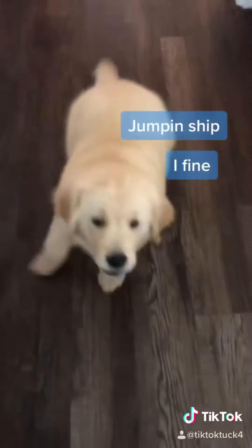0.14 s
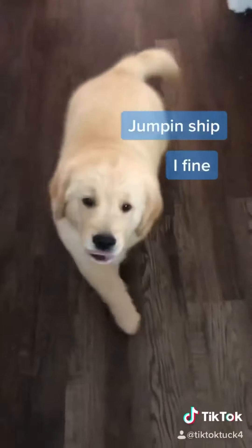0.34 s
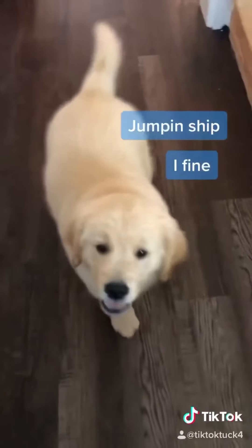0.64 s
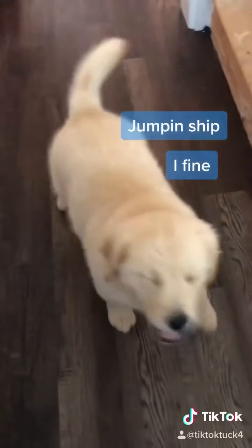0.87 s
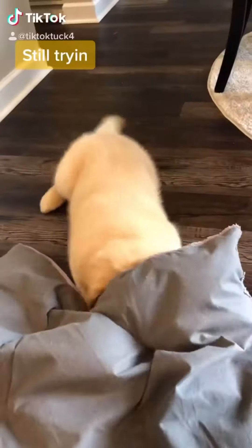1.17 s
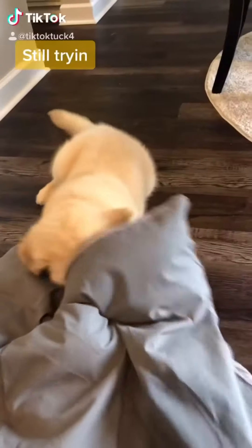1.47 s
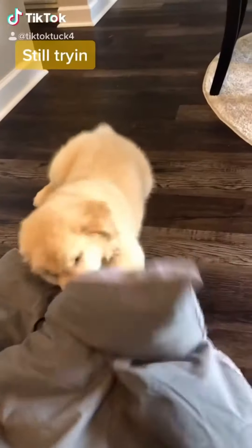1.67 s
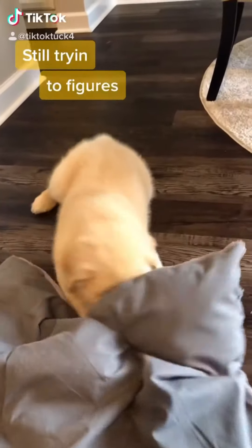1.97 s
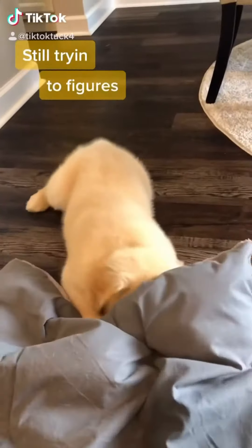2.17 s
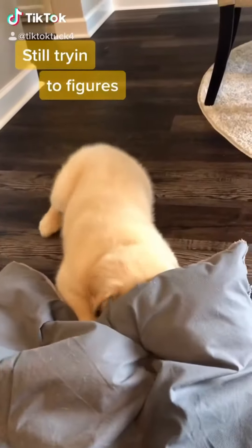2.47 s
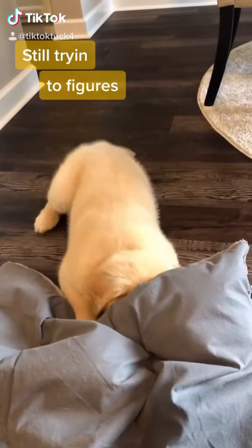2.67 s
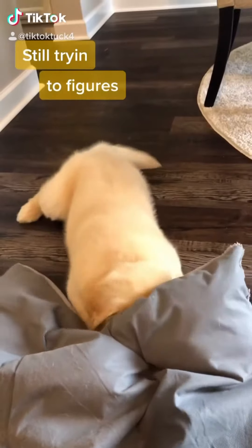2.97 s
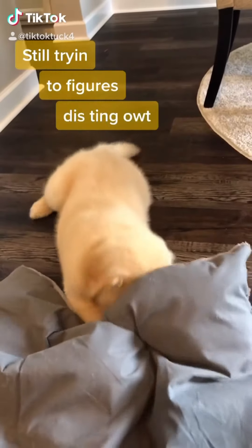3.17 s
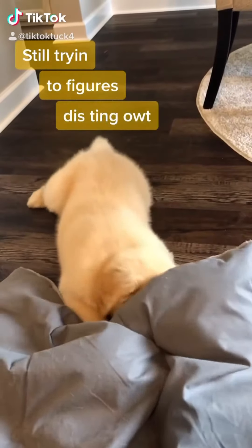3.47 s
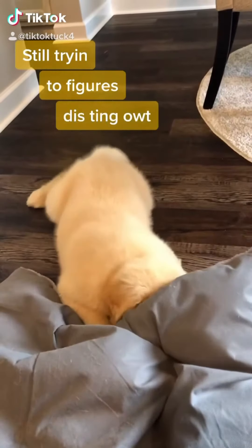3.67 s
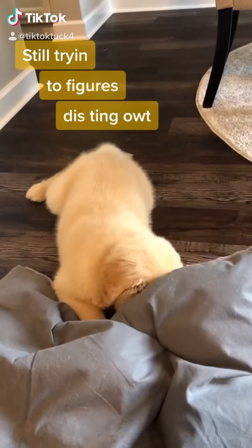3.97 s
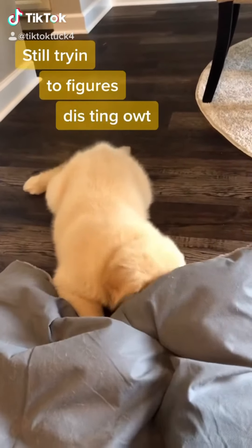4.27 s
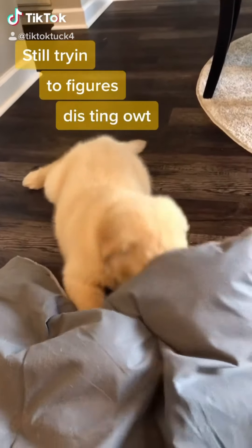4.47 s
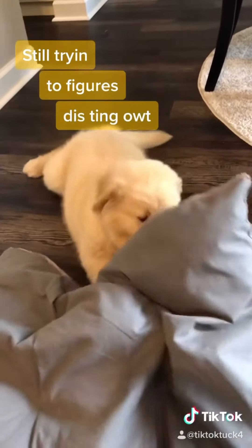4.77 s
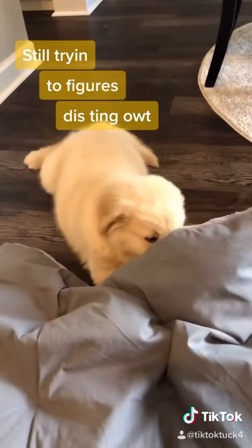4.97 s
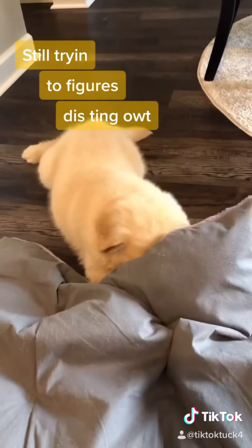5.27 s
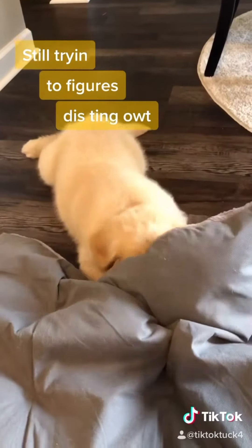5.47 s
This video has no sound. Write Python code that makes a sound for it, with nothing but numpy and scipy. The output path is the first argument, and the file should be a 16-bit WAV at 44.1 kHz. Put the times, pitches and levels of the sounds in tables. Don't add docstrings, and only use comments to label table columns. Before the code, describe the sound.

Close mono indoor sound. First a scuff and a tight burst of loud paw steps on a wood floor, with boomy air and a thin whine. After a brief dropout comes quiet room tone with fridge hum, then irregular bedding rustles and snaps, scratching claws, soft paw taps and rebounding elbow blows in clusters, a small sniff, and a last shove.

```python
import sys
import numpy as np
from scipy import signal
from scipy.fft import rfft, irfft
from scipy.io import wavfile
from scipy.ndimage import uniform_filter1d

SR = 44100
rng = np.random.default_rng(int(sys.argv[2]) if len(sys.argv) > 2 else 0)


def volts(x):
    e = np.asarray(x, float) / 20
    return 10 ** e


def master_out(mix):
    frames = np.transpose(np.atleast_2d(mix))
    ceiling = np.clip(frames, -1, 1)
    pcm = np.round(ceiling * 32767).astype(np.int16)
    wavfile.write(sys.argv[1], SR, pcm)


N = 247842
T = np.arange(N) / SR

CUT_S, BACK_S, CLEAR_S = .7215, .953, 1.097

# (frequency [Hz], density [dB per Hz])
ROOM_AIR = [(15, -34.5), (25, -12.5), (80, -0.5), (148, -3.5), (216, -3.5), (307, -2.5), (670, -12.5),
            (1000, -13), (1550, -15.5), (2320, -28.5), (3120, -22), (6630, -31), (15700, -32.5)]
# (frequency [Hz], density [dB per Hz])
FIRST_ROOM_AIR = [(15, -55), (25, -19), (59, -3), (113, 0), (316, -10), (575, -11), (977, -11),
                  (1120, -9.5), (1500, -17.5), (1950, -24.5), (3300, -120)]
# (frequency [Hz], width [Hz], level [dB])
FRIDGE_HUM = [(210.7, 10, -69.5), (74.5, 22, -71)]
ROOM_DB, FIRST_ROOM_DB = -63.5, -49.5

# (start [s], time to die away [s], level [dB])
SHOVES = [
    (.003, 0.18, -33.5),
    (.362, 0.048, -32),
    (.397, 0.22, -34),
    (.955, 0.23, -57),
    (2.15, 0.071, -52.5),
    (2.7, 0.24, -50.5),
    (3.6, 0.28, -52.5),
    (4.042, 0.24, -47),
    (5.455, 0.015, -43),
    (5.47, 0.12, -53),
]
# (middle [s], half length [s], level [dB])
DRAGS = [(0.31, 0.16, -51.5), (0.685, .2, -47.5), (1.081, 0.11, -48.5), (1.22, 0.079, -54),
         (1.444, 0.022, -58), (1.705, 0.16, -61.5), (1.847, 0.11, -54), (1.933, 0.12, -47.5),
         (2.319, 0.13, -45.5), (2.555, 0.13, -43), (2.668, .07, -49), (2.913, 0.18, -65),
         (3.036, 0.099, -47), (3.138, 0.17, -51.5), (3.417, 0.19, -56.5), (4.004, 0.034, -55),
         (4.46, 0.31, -57.5), (4.767, 0.089, -61), (5.072, 0.12, -61), (5.2, 0.083, -49),
         (5.307, .11, -38.5)]
# (frequency [Hz], width [Hz], level [dB])
BOARD_MODES = [(600, 276, 3), (994, 140, -0.5), (1520, 97, -5.5), (377.3, 190, -9.5)]
# (time [s], peak level [dB], end pitch [Hz], decay [ms])
THUDS = [(.004, -38, 422, 35), (1.683, -43, 312, 7.4), (3.357, -44, 297, 9.8), (0.353, -26.5, 182, 9.3),
         (1.24, -48, 156, 17), (1.428, -52, 278, 15), (1.83, -47, 300, 10), (1.901, -45, 277, 10),
         (2.692, -41, 130, 12.5), (3.169, -55, 265, 20), (3.968, -55, 288, 20), (4.079, -39.5, 292, 10),
         (4.302, -40.5, 211, 7.9), (4.752, -38, 168, 7.7), (5.46, -56, 260, 15)]

# (middle [s], half length [s], level [dB], dry sheen over cloth [dB])
SLIDES = [(.01, 0.06, -68, 0), (0.183, 0.13, -50.5, -3.5), (0.667, 0.088, -54, -35),
          (.97, 0.067, -63, -2.5), (1.07, 0.047, -46.5, -8), (1.21, 0.085, -60, -2.5),
          (2.03, 0.27, -70.5, -9), (1.48, 0.43, -78.5, 6.5), (1.783, 0.18, -60, -6.5),
          (2.314, 0.071, -49, 2.5), (2.386, 0.042, -77, -15), (2.499, 0.018, -47.5, 1),
          (2.537, 0.046, -48.5, 6.5), (2.71, 0.28, -58, -5), (3.045, .085, -46, 1),
          (3.705, 0.18, -65.5, -0.5), (4.148, 0.14, -72.5, -20), (4.49, .28, -67, 2.5),
          (4.77, .13, -69, -15), (5.22, 0.19, -63.5, -2), (5.306, .05, -46, -2.5)]
# (start [s], time to die away [s], level [dB], dry sheen over cloth [dB])
TUGS = [(.331, 0.13, -40, -14.5), (.36, 0.41, -58.5, -12), (1.032, 0.067, -53.5, -8),
        (1.102, 0.065, -48, 1), (1.909, 0.082, -54, 5), (2.132, 0.071, -54, -3), (2.153, 0.056, -45, 3.5),
        (2.269, 0.14, -47.5, 4), (2.472, 0.02, -56, -5), (2.896, 0.052, -61, 4), (2.981, 0.16, -48, -2),
        (3.137, 0.097, -62, 0), (3.207, 0.038, -63, 5), (1.77, 0.35, -66, 1), (3.566, 0.34, -66.5, 0),
        (4.761, 0.019, -67, 18), (4.81, 0.088, -59.5, -9), (4.985, 0.51, -70, 1), (5.35, 0.17, -62.5, -5),
        (5.522, 0.11, -63.5, -9)]
# (frequency [Hz], density [dB per Hz])
FOLD_COLOUR = [(800, -22.5), (1400, -3), (2600, -6.5), (4500, -17), (9000, -39)]
WEAVE_COLOUR = [(1800, -25), (3400, -4), (4400, -2), (7000, -5.5), (11000, -23.5)]
SHEEN_COLOUR = [(5000, -12), (7600, -1), (10000, -3.5), (15700, -8)]
TUG_START_S, SHOVE_START_S = .008, .012
FADE_DB, SWELL_POWER, REST_DB = 19, 1.25, -88
FOLD_DB, FOLD_PER_SHEEN, FOLD_BY_LIMB_DB = -5.5, -0.21, -11

# (time [s], peak level [dB])
SNAPS = [(.3296, -26), (1.029, -38), (1.2318, -38), (1.9064, -37), (2.1505, -29), (2.2687, -32),
         (1.8325, -35), (2.282, -30), (2.345, -24), (2.3127, -43), (2.3248, -24), (2.509, -21),
         (4.7592, -37.5), (5.2767, -38), (5.2965, -34), (5.312, -40), (5.329, -42), (5.521, -54)]
# (time [s], peak level [dB], board pitch [Hz], gap to first rebound [ms])
STEPS = [
    (.3303, -30.5, 744, 6.2),
    (.3521, -11, 870, 3.7),
    (.3748, -19.5, 660, 2.77),
    (.3827, -21, 669, 13.2),
    (.4109, -36, 694, 11),
]
# (time [s], peak level [dB])
CLAWS = [(.3509, -13), (1.051, -39.5), (1.1866, -38.5), (1.2169, -37.5), (1.832, -35), (2.1344, -32),
         (2.2514, -53), (2.3451, -36), (2.3999, -35.5), (2.4795, -31.5), (2.4928, -31), (2.5219, -28),
         (2.5377, -33), (2.616, -36.5), (2.8953, -37), (2.9818, -50), (3.1357, -28), (3.1454, -38),
         (3.207, -44), (4.0342, -48), (4.0617, -43), (4.8115, -48), (5.0637, -46), (5.109, -36.5),
         (5.138, -38.5), (5.1587, -40), (5.1861, -41), (5.2425, -52), (5.442, -43), (3.7306, -46)]
# (time [s], peak level [dB], board pitch [Hz])
TAPS = [(.9865, -51, 495), (1.0356, -45.9, 594), (1.0531, -42, 1110), (1.1075, -49, 1050),
        (1.2163, -55, 1030), (1.4318, -54, 424), (1.354, -54, 980), (1.68, -45.5, 1040),
        (1.8017, -45.5, 814), (1.8315, -46, 800), (1.9037, -36, 804), (1.931, -37.5, 950),
        (2.2537, -55, 624), (2.4005, -39, 834), (2.574, -30.5, 650), (3.1822, -41.5, 606),
        (3.3559, -47.5, 730), (3.591, -51, 750), (3.6375, -35.5, 622), (3.6896, -45.5, 600),
        (3.7307, -41.5, 650), (4.0028, -36, 529), (4.1787, -48.5, 547), (4.7596, -48.5, 590),
        (5.1098, -46, 880), (5.139, -38.5, 586), (1.639, -50, 1128), (5.276, -36.5, 573),
        (5.2965, -34.5, 600), (5.351, -39, 548)]
# (time [s], peak level [dB], board pitch [Hz], gap to first rebound [ms])
BLOWS = [(2.6191, -24.8, 652, 12.5), (2.6466, -29.5, 685, 9.2), (2.6609, -33.5, 620, 5.2),
         (2.6737, -33, 640, 8.7), (2.6876, -45, 610, 10.2), (3.139, -38.5, 694, 8.9),
         (3.9522, -34.5, 583, 9.2), (3.9807, -39, 625, 10.7), (4.0357, -29, 600, 6.3),
         (4.0627, -28, 684, 9.4), (4.0895, -29, 616, 5.7), (5.4438, -35, 600, 4.02),
         (5.4477, -32.5, 600, 14.5)]
REBOUND_DB, REBOUND_PITCH, NEXT_GAP = -5, 0.918, .8
TAP_CYCLES, STEP_CYCLES = 2.59, 2.16

# (time [s], level [dB], nostril resonance [Hz])
SNIFF = [
    (4.68, -80, 2790),
    (4.686, -66, 2820),
    (4.705, -70, 3017),
    (4.735, -63.5, 3400),
    (4.772, -77, 3224),
    (4.8, -62, 3470),
    (4.825, -72.5, 3290),
    (4.875, -78, 4060),
    (4.89, -84, 4110),
]


def unit(x):
    return x / np.sqrt(np.mean(x ** 2))


def band(x, lo_hz, hi_hz, order=2):
    return signal.sosfilt(signal.butter(order, [lo_hz, hi_hz], "band", fs=SR, output="sos"), x)


def colour(x, table):
    hz, db = np.transpose(table)
    f = np.maximum(np.arange(N // 2 + 1) * SR / N, 1)
    gain = volts(np.interp(np.log(f), np.log(hz), db))
    return irfft(rfft(x) * gain, N)


def walk(rate):
    hold = int(SR / rate)
    levels = np.repeat(rng.standard_normal(N // hold + 1), hold)
    return uniform_filter1d(levels, hold)[:N] * 0.952


def add(out, s, x):
    i = int(s * SR)
    out[i:i + len(x)] += x[:N - i]


def room():
    air = volts(ROOM_DB - 2.0) * unit(colour(rng.standard_normal(N), ROOM_AIR))
    low = band(air, 13, 300)
    air = low * volts(2.0 * walk(25)) + (air - low) * volts(2.1 * walk(2.6))
    hum = np.zeros(N)
    for hz, width, db in FRIDGE_HUM:
        hum += volts(db) * unit(band(rng.standard_normal(N), hz - width / 2, hz + width / 2, order=1))
    first_air = unit(colour(rng.standard_normal(N), FIRST_ROOM_AIR))
    first_air = first_air * volts(FIRST_ROOM_DB + 1.2 * walk(5.7))
    return air + np.where(T < BACK_S, first_air, hum)


def whine(hz, db):
    phase = 2 * np.pi * np.cumsum(hz * (1 + 0.0349 * walk(9))) / SR
    waver = unit(band(rng.standard_normal(N), 3, 22, order=1))
    return volts(db) * waver * np.sin(phase) * (T < BACK_S)


def moves(sudden, swelling, start_s):
    t = T[::40]
    levels = []
    for s, long, db, *_ in sudden:
        levels.append(db - FADE_DB * np.maximum((s - t) / start_s, (t - s) / long))
    for s, long, db, *_ in swelling:
        levels.append(db - FADE_DB * np.abs((t - s) / long) ** SWELL_POWER)
    return volts(np.array(levels)) ** 2


def total_db(power):
    level = 10 * np.log10(power.sum(axis=0) + volts(REST_DB) ** 2)
    return np.interp(T, T[::40], level)


def fibres(spread_db, smear_ms):
    size = volts(spread_db * rng.exponential(size=N).clip(0, 3.5)) * (rng.random(N) < .02)
    tail = np.exp(-np.arange(400) / (smear_ms * SR / 1000))
    power = signal.fftconvolve(size ** 2, tail)[:N].clip(0) + 1.3
    return unit(rng.standard_normal(N) * np.sqrt(power))


def shuffle(db):
    push = fibres(spread_db=5.5, smear_ms=2.9) * volts(1.1 * walk(60))
    boards = np.zeros(N)
    for hz, width, mode_db in BOARD_MODES:
        boards += volts(mode_db) * unit(band(push, hz - width / 2, hz + width / 2))
    return volts(db - 4.0) * unit(boards)


def thuds():
    out, t = np.zeros(N), T[:6000]
    rise = np.exp(-t / 0.0078)
    for s, db, hz, decay_ms in THUDS:
        phase = 2 * np.pi * np.cumsum(hz * (1 + 0.36 * rise)) / SR
        shape = (1 - rise) * np.exp(-t * 1000 / decay_ms)
        add(out, s, volts(db) * shape * np.sin(phase))
    return out


def cloth(db, sheen_db, fold_db):
    rub = fibres(spread_db=1.0, smear_ms=1.0) * volts(1.2 * walk(45))
    weave = unit(colour(rub, WEAVE_COLOUR)) * volts(-4.0)
    sheen = unit(colour(rub, SHEEN_COLOUR)) * volts(sheen_db - 2.5)
    fold = unit(colour(rub, FOLD_COLOUR)) * volts(fold_db + 0.5)
    return volts(db) * (weave + sheen + fold)


def bounce(x, share, lag_ms):
    lag_s = lag_ms / 1000 * (1 + 0.37 * walk(7)).clip(.2)
    late = np.interp(T - lag_s, T, x)
    return (x + share * late) / np.sqrt(1 + share ** 2)


def slips(table, hz, ms):
    out, t = np.zeros(N), T[:3000]
    shape = np.exp(-t * 1000 / ms) + 0.85 * np.exp(-t / 0.00071)
    for s, db in table:
        burst = unit(band(rng.standard_normal(3000), hz * .5, hz * 1.3, order=1))
        add(out, s, volts(db - 13.5) * burst * shape)
    return out


def seam_snaps():
    return slips(SNAPS, hz=7050, ms=1.4)


def rings(table, cycles):
    out = []
    for s, db, hz, *gap_ms in table:
        ring_ms = 1000 * cycles / hz
        out.append((s, db, hz, ring_ms))
        if gap_ms:
            gap_s, low_hz = gap_ms[0] / 1000, hz * REBOUND_PITCH
            out.append((s + gap_s, db + REBOUND_DB, low_hz, 1.2 * ring_ms))
            out.append((s + gap_s * (1 + NEXT_GAP), db + 2.2 * REBOUND_DB, low_hz, ring_ms))
    return out


def knocks(table):
    out, t = np.zeros(N), T[:600]
    for s, db, hz, ring_ms in table:
        phase = 2 * np.pi * np.cumsum(hz * (1 + 4.16 * np.exp(-t / 0.00043))) / SR
        shape = (1 - np.exp(-t / 0.0007)) * np.exp(-(t * 1000 / ring_ms) ** 19.0)
        add(out, s, volts(db) * shape / shape.max() * np.sin(phase))
    return out


def trot():
    return knocks(rings(STEPS, STEP_CYCLES))


def claw_ticks():
    return slips(CLAWS, hz=2880, ms=5.14)


def paws_and_elbows():
    return knocks(rings(TAPS + BLOWS, TAP_CYCLES))


def sniff():
    s, db, hz = np.transpose(SNIFF)
    breath = unit(band(rng.standard_normal(N), 12.4, 230)) * volts(3.0 * walk(50))
    phase = 2 * np.pi * np.cumsum(np.interp(T, s, hz)) / SR
    centre = np.sin(phase) + volts(-3.0) * np.sin(0.32 * phase)
    level = np.interp(T, s, db, left=-120, right=-120) + 8.0
    return volts(level) * breath * centre


def echo(x, t60_s, db):
    t = T[:SR // 2]
    tail = band(rng.standard_normal(len(t)), 250, 2800, order=1)
    tail = tail * np.exp(-np.log(1000) * t / t60_s) * (t > .006)
    return volts(db) * signal.fftconvolve(x, tail / np.sqrt(np.sum(tail ** 2)))[:N]


def burrow(limbs):
    strokes = moves(TUGS, SLIDES, TUG_START_S)
    sheen_db = np.array([row[-1:] for row in TUGS + SLIDES])
    db = total_db(strokes)
    sheen = strokes * volts(sheen_db) ** 2
    stroke_folds = strokes * volts(FOLD_DB + FOLD_PER_SHEEN * sheen_db) ** 2
    limb_folds = limbs * volts(FOLD_BY_LIMB_DB) ** 2
    folds = np.vstack([stroke_folds, limb_folds])
    return cloth(db, total_db(sheen) - db, total_db(folds) - db)


def scene():
    limbs = moves(SHOVES, DRAGS, SHOVE_START_S)
    bedding = burrow(limbs)
    steps = trot()
    near = seam_snaps() + claw_ticks() + paws_and_elbows()
    mono = room() + whine(hz=1130, db=-52)
    mono += shuffle(total_db(limbs)) + thuds()
    mono += bounce(bedding, share=0.22, lag_ms=0.45)
    mono += steps + near + sniff()
    mono += echo(steps, 0.71, -20) + echo(near, 0.32, -15.0)
    return np.array([mono, mono])


def top_cut(x):
    return signal.sosfilt(signal.butter(12, 16610, fs=SR, output="sos"), x)


def record(dry):
    dull = signal.sosfilt(signal.ellip(10, .2, 80, 6600, fs=SR, output="sos"), dry)
    x = np.where((T > CUT_S) & (T < CLEAR_S), dull, dry)
    x = x * ((T < CUT_S) | (T > BACK_S))
    x = signal.sosfilt(signal.butter(2, 36, "high", fs=SR, output="sos"), x)
    x = signal.sosfilt(signal.ellip(10, .2, 60, 15750, fs=SR, output="sos"), x)
    return top_cut(x)


dry = scene()
out = record(dry)
master_out(out)
```